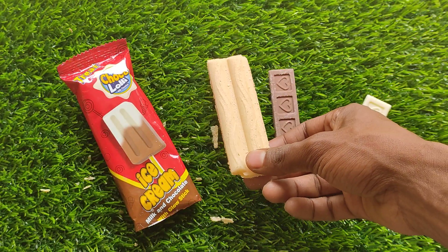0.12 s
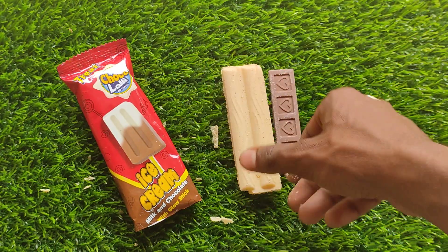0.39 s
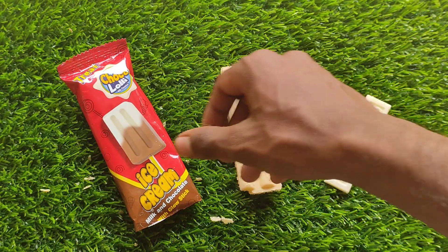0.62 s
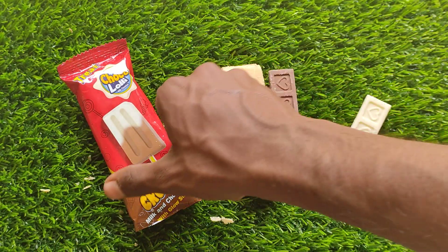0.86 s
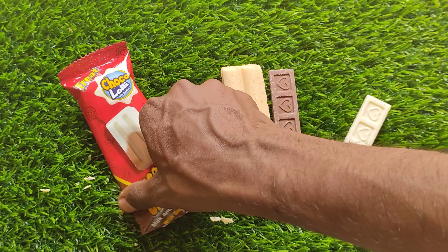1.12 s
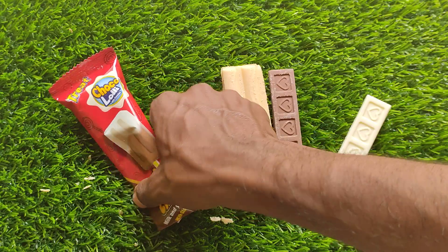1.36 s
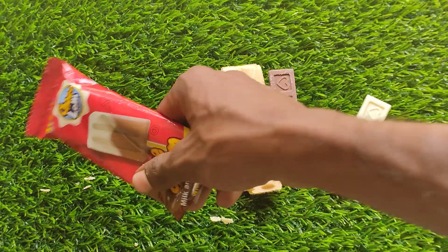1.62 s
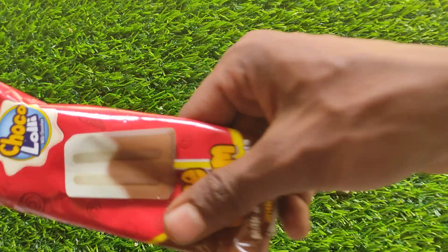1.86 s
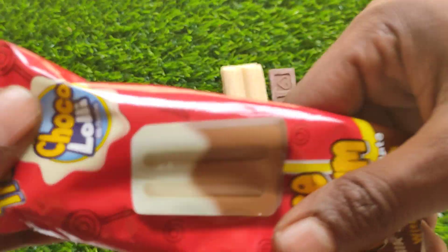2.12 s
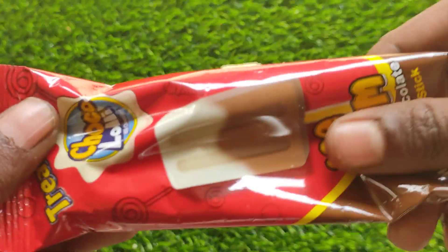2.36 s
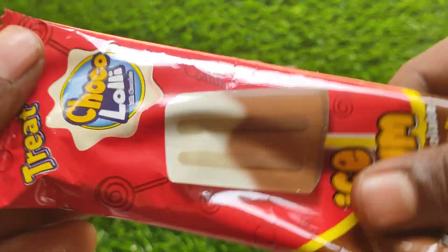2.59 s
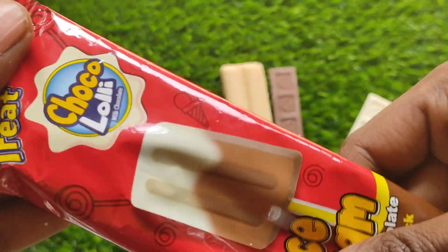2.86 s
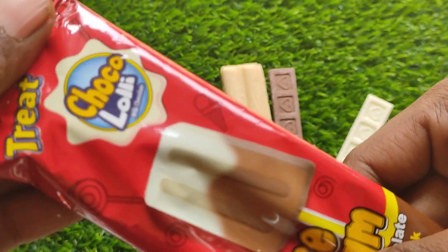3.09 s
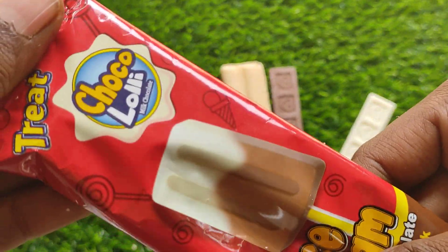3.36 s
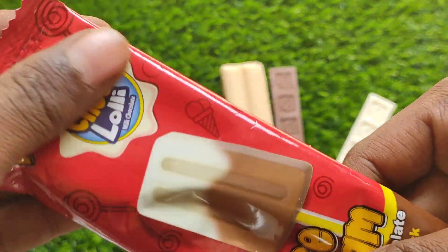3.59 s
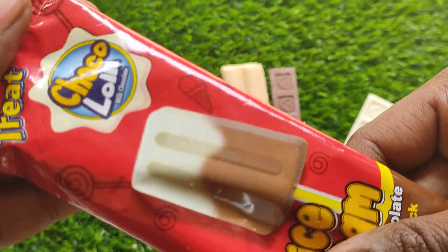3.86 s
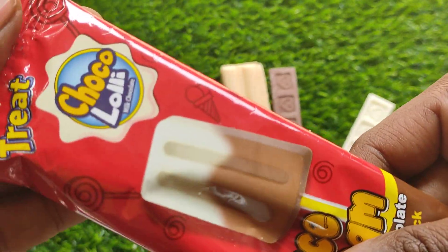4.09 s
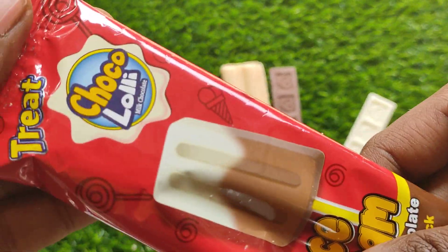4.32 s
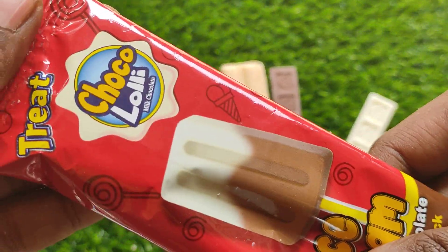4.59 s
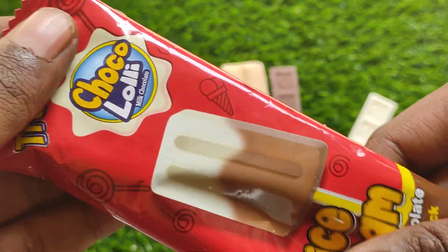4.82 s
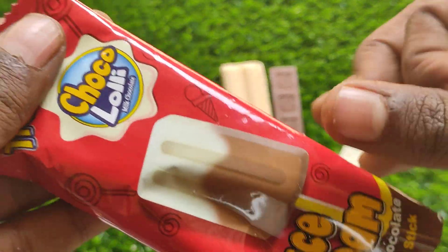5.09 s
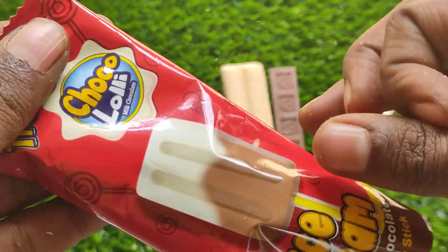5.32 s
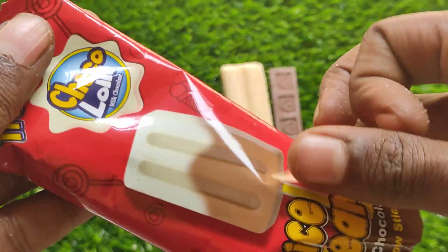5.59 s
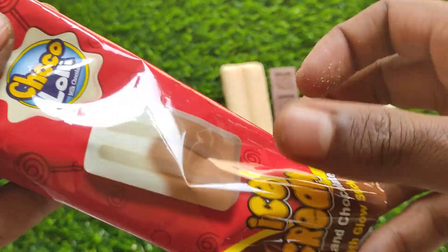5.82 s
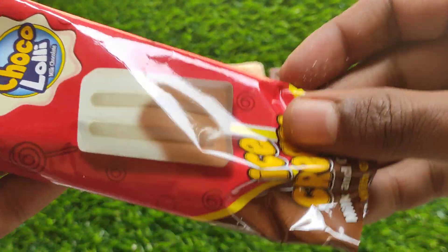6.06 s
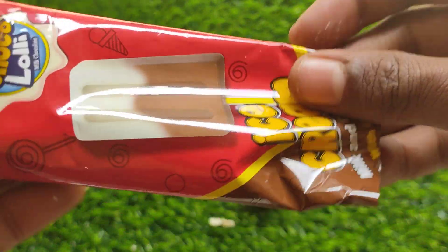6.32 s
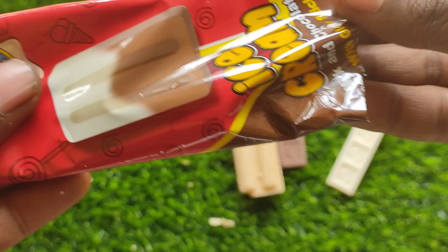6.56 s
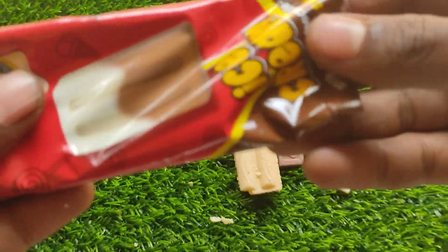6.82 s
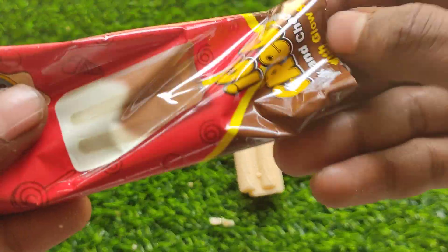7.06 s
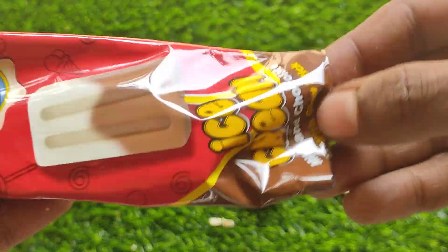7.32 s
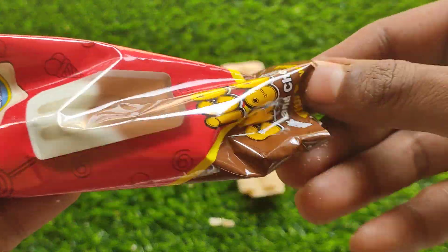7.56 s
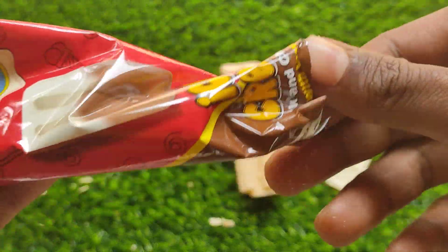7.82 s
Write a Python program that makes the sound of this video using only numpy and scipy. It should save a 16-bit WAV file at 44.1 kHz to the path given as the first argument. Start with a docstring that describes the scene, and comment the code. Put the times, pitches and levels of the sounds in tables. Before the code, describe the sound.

Close stereo microphones catch a thin, foil-lined wrapper handled outdoors. About a second of low rumble and hiss comes first, with faint grass swishes and a soft knock. Then bright, dry snaps and fine crinkle arrive in bursts, thin out in the middle, return as three strong flicks, and thicken into continuous crackling. A distant bird chirps every couple of seconds; nearby walls add a very short tail.

```python
"""A foil-lined sweet wrapper crackles in the hands, close to a pair of microphone ports.
Facets of the film buckle with short ringing snaps over a fine crinkle; nearby walls add a short tail.
A far bird chirps now and then, with swishes of grass, a faint whistle and soft knocks.
Low rumble and hiss are filtered noise; a dull swell is noise through a few low resonances."""
import sys
import numpy as np
from scipy import signal
from scipy.io import wavfile
from scipy.ndimage import uniform_filter1d

SR = 44100
rng = np.random.default_rng(int(sys.argv[2]) if len(sys.argv) > 2 else 0)


def generate_wav(signal):
    """Clip the signal to [-1, 1] and save it as 16-bit WAV at the path in sys.argv[1]."""
    frames = np.transpose(np.atleast_2d(signal))
    scaled = np.clip(frames, -1, 1) * 32767
    pcm = np.round(scaled).astype(np.int16)
    wavfile.write(sys.argv[1], SR, pcm)


def amplitude_ratio(level_db):
    """Convert a level in decibels to the matching linear amplitude (field) ratio."""
    exponent = np.asarray(level_db, float) / 20
    return 10 ** exponent


N = 349713   # length in samples

# Colour of the rumble and hiss. Each row: frequency in Hz, relative level in dB per Hz.
AIR_COLOUR = [(12, -30), (20, 2), (72, 1.5), (158, -13.5), (262, -14), (434, -25), (897, -25), (1860, -30),
              (3740, -30), (4540, -40.5), (7520, -41), (9670, -56.5), (13500, -29), (16000, -51.5)]
# How alike the air is at the two ports. Each row: frequency in Hz, likeness (1 = the same, 0 = unrelated).
AIR_LIKENESS = [(60, 0.76), (240, 0.75), (950, 0), (3770, 0.053), (15000, 0.73)]
# When the bird calls. Each row: start in seconds, level in dB before the distance is added.
BIRD_CALLS = [(-.13, -61), (1.964, -57), (4.206, -57), (6.242, -57)]
# The shape of one chirp. Each row: time into the chirp in seconds, pitch in Hz, relative level in dB.
CHIRP_SHAPE = [(0, 4550, -25), (.008, 5400, 1.5), (0.03, 4800, 0.5), (0.044, 4500, -12), (.058, 3780, 4),
               (0.074, 3100, -12.5), (.085, 3130, -21)]
# The hand brushes the grass. Each row: start in seconds, level in dB before the fade, upper edge in Hz.
GRASS_BRUSHES = [(0.129, -57, 3200), (.385, -61, 8000), (.66, -69.5, 8950)]
# A faint far whistle. Each row: time in seconds, pitch in Hz, level in dB.
WHISTLE_PATH = [(.2, 3600, -100), (.24, 3490, -78), (.32, 3460, -79), (.37, 3480, -100)]
# Soft knocks. Each row: start in seconds, level in dB before the fade, pitch in Hz.
KNOCKS = [(0.431, -44, 83), (4.913, -40.5, 113.4), (4.943, -39.5, 104), (5.241, -34.5, 183),
          (5.509, -32, 159.6), (5.794, -32, 73), (6.146, -37, 124), (6.175, -40, 108)]
# How hard the hands work the film. Each row: time in seconds, fine crinkle level in dB.
HAND_WORK = [(.97, -70.5), (1.07, -67.5), (1.23, -61), (1.75, -62.5), (1.86, -73.5), (2.16, -71),
             (2.21, -68.5), (2.69, -69), (3.0, -68), (3.05, -76), (3.45, -74), (3.7, -57.5), (3.85, -70.5),
             (4.85, -75), (4.95, -50), (5.0, -73), (5.98, -71), (6.04, -68), (6.42, -61.5), (6.47, -56.5),
             (6.78, -53.5), (6.87, -55), (7.0, -45.5), (7.07, -59.5), (7.36, -60.5), (7.46, -64.5),
             (7.54, -48.5), (7.75, -71.5), (7.8, -46.5), (7.93, -65)]
# Where the hands are. Each row: time in seconds, head start of the left port in ms, left over right in dB.
HAND_PLACE = [(0, 0.059, -1), (1.5, .12, 3), (2.5, 0.11, 0.5), (3.502, 0.19, 1), (4.7, 0.25, -1),
              (5.502, 0.11, -0.4), (6.2, .24, 3.6), (7.9, 0.26, 3)]
# Colour of the crinkle. Each row: frequency in Hz, relative level in dB per Hz.
FILM_COLOUR = [(300, -3.5), (900, -8.5), (2500, 4), (4700, -12.5), (7500, -8), (11000, -18.5),
               (14000, -11.5)]
# The clearest buckles of facets. Each row: time in seconds, level in dB, centre of the ringing in Hz,
# bass in dB against that level, top in dB against that level (both before a shared lift).
CLEAR_BUCKLES = [(1.038,-26,4270,-24,-14),(1.082,-42.5,5600,-18.5,-12),
                 (1.1706,-42.5,6400,-17.5,-13),(1.1986,-30,4600,-26.5,-11),(1.281,-32.5,6100,-15,-6),(1.3165,-35,6760,-28,-7),
                 (1.351,-35,3250,-26.5,-15),(1.456,-49,3950,-10,-11),(1.5096,-41.5,6500,-24,-10),(1.5554,-38,5500,-24,3.5),(1.6755,-36.5,2700,-19,-17),(1.691,-36.5,3200,-12,-18),
                 (1.739,-42.5,3900,-3,-22),(1.7768,-27.5,5800,-26,-12),(1.8073,-35.5,5460,-12.5,-19),(1.847,-34.5,3540,-16.5,-13),
                 (2.0528,-37,4530,-13,-10),(2.178,-24.5,6200,-14,-18),(2.1856,-19.5,5450,-16.5,-5.5),(2.207,-38,5000,-6.5,-11),
                 (2.2504,-27,4000,-19,-13),(2.2563,-14.5,4600,-13.5,-7),(2.2672,-28,3500,-16,-12),(2.306,-26.5,4300,-18,-12),
                 (2.332,-34.5,2800,-7.5,-23),(2.3765,-38,4770,-15.5,-7),(2.4045,-31.5,3800,-2.5,-24),(2.4118,-29.5,5040,-16,-10),
                 (2.432,-16,5740,-23.5,-14.5),(2.4429,-22,5130,-25.5,-13),(2.5523,-35,4660,-10.5,-19),(2.5613,-31,3000,-14.5,-17),
                 (2.599,-14,4800,-24.5,-21),(2.6043,-20,4500,-20,-16),(2.6378,-25,7700,-20.5,0.5),(2.6518,-48,6700,-16,-3),(2.6655,-36,3300,-18,-21),
                 (2.675,-35,4500,-7,-23),(2.754,-41,6400,-16,-18),(2.7998,-31,3400,-11,-19),(2.871,-30.5,4070,-11,-10),
                 (2.9901,-31,5300,-11,-9.5),(3.1329,-45,4450,-6,-17),(3.18,-44,6200,-10,-8),(3.402,-39.5,4560,-12,-16),
                 (3.4792,-22.5,3750,-12.5,-17.5),(3.4893,-34,6000,-9,5.5),(3.4955,-17.5,7100,-27.5,-9),(3.5176,-35,4900,-13,-21),
                 (3.5294,-24,5530,-12.5,-5),(3.594,-40,3730,-2.5,-12),(3.69,-18,5200,-20,-11),(3.7199,-30,5500,-7,-11),
                 (3.725,-31,4180,-9,-9),(3.8141,-38.5,7140,-12,2.5),(3.844,-43.5,2800,-2.5,-29),(3.994,-36.5,3900,-7,-20),
                 (4.0208,-26.5,5900,-14.5,-1.5),(4.0586,-25.5,5700,-14.5,-9),(4.725,-27,7600,-24.5,2),(4.7612,-23,4900,-18.5,-12),
                 (4.886,-46,4100,-1.5,-11),(4.9228,-51,4430,-6,-12.5),(4.9705,-37.5,6650,-9.5,-9.5),(5.2516,-18,4130,-11.5,-10),(5.256,-13,3350,-9.5,-13),
                 (5.2838,-33,5400,-17,-9),(5.2935,-32.5,4450,-9.5,-14),(5.5112,-7,4600,-17,-13),(5.5189,-15.5,6040,-6.5,-23),(5.569,-36.5,4300,-5.5,-17),
                 (5.6136,-33,5830,-19.5,-13),(5.7981,-18,3700,-13.5,-7),(5.8052,-12.5,3890,-7,-10),(5.832,-28,3400,-4.5,-18),
                 (6.0022,-31,5500,-15,-16),(6.0195,-28,3500,-12.5,-17),(6.042,-21.5,2760,-19.5,-26),(6.0683,-33.5,4280,-2,-10.5),
                 (6.101,-38,3420,-4,-25),(6.1942,-29.5,3600,-6.5,-15),(6.2088,-20,7060,-23.5,-15),(6.2134,-29.5,4500,-5,-6),
                 (6.3426,-42,6900,-8.5,-4),(6.4434,-41,4200,-1,-19),(6.462,-30.5,2980,-8.5,-7.5),(6.4763,-28.5,2780,-14.5,-31),
                 (6.536,-39,5100,-1,-6),(6.555,-34.5,6200,-7,-10),(6.5874,-44.5,3230,-6,0),(6.6452,-21.5,6470,-21.5,0.5),
                 (6.6977,-40,4400,1.5,-4),(6.7391,-34,5730,-7,-2),(6.8052,-32,2940,-10,-20),(6.8215,-33,6400,-6,-5),(6.902,-25,4440,-23.5,-9),
                 (6.925,-36,3500,-7.5,-1),(6.9306,-29,3000,-19.5,-12),(6.968,-46,2390,-6,-8),(6.9845,-38,5330,-22.5,-5),(6.9906,-40.5,3500,1.5,5),(7.055,-32.5,4000,-32,-8),(7.097,-27,5800,-17.5,-8),
                 (7.1056,-34,4200,-10,-10),(7.11,-17,4800,-43,-8.5),(7.1264,-22.5,6000,-13.5,-8),(7.175,-25,6940,-21.5,-4),
                 (7.2115,-30,3780,-1,-6),(7.2458,-24,4470,-26,-4),(7.313,-15.5,2970,-19.5,-7.5),(7.337,-29.5,4000,-5.5,-2),
                 (7.3531,-18,6500,-28.5,-2),(7.357,-21.5,4930,-10,-3.5),(7.3673,-21,3800,-15.5,-17),(7.3786,-21.5,4500,-15,-11),
                 (7.402,-26,6000,-9,-8),(7.4542,-27,6200,-34,-9),(7.5387,-31.5,3320,2.5,0),(7.542,-32,4400,-15,-6.5),
                 (7.557,-34.5,3486,-2.5,-22),(7.6443,-31.5,5500,-3.5,-17),(7.6512,-28.5,6140,-10.5,-1),(7.7094,-28.5,6430,-11.5,-3),
                 (7.7635,-14.5,6070,-26,-4.5),(7.7932,-30,4220,-18,-13),(7.8118,-28.5,5000,-17.5,-15),(7.8453,-21.5,6050,-9.5,-12),
                 (7.8705,-31,4200,-9.5,-29),(7.8839,-33,3350,-5,-26)]
# The dull swell over time. Each row: time in seconds, level in dB.
SWELL_LEVEL = [(4.3, -86), (4.348, -89), (4.378, -57), (4.594, -69), (4.626, -55.5), (4.836, -55.5),
               (5.15, -79.5)]
# Resonances of the dull swell. Each row: frequency in Hz, width in Hz, relative level in dB.
SWELL_RESONANCES = [(201, 19, 6.5), (256, 20, 9), (323.3, 25, 14), (367, 12, 11.5), (507, 17, -8),
                    (611, 14, 4.5), (714, 51, -5)]
# Colour of the microphone ports. Each row: frequency in Hz, width in Hz, gain in dB.
PORT_COLOUR = [(7110, 1310, 6.5), (10400, 3100, -4)]

AIR_DB, AIR_LEFT_DB = -57, 0.5   # the rumble and hiss lean left
BRUSH_RISE_S, BRUSH_T60_S, BRUSH_LOW_HZ = 0.0039, 0.39, 700
PICKUP_S = 0.96    # the film is untouched before this
STILL_DB = -73     # handling below this leaves the film all but silent
STIR_DB, STIR_T60_S, STIR_CAP_DB = -29, 0.28, -70.5   # a clear buckle stirs a dying patter of creases
LEAD_IN_DB, LEAD_IN_T60_S = 5.5, 0.014   # and the crinkle swells briefly just before each clear buckle
FOLD_MS, FOLD_MS_PER_BASS_DB = 2.2, 0.0555   # bassier facets are larger and fold more slowly
FLICKS_S, FLICK_LENGTH_S, FLICK_FOLD_MS = [5.245, 5.505, 5.79], 0.07, 4.0   # flicks fold whole panels
CLUMP_S = 0.012    # chance buckles come in threes, spread about this far
LESSER_OVER_DB, LESSER_SPREAD_DB = 10.5, 3.0   # how far chance buckles stand over the crinkle
LESSER_BASS_DB, LESSER_TOP_DB, LESSER_COLOUR_DB = -7.5, -8, 7
STEADY_TOP_HZ, ROLL_OFF_HZ = 15000, 14400   # where the steady sounds end, and where the whole mix rolls off


def in_time(rows):
    """Columns of a table, joined by straight lines, one value a sample."""
    s, *columns = np.transpose(rows)
    return [np.interp(np.arange(N) / SR, s, column) for column in columns]


def at_hz(points, hz):
    """A spectrum read on a log-frequency axis."""
    points = np.array(points)
    return np.interp(np.log(hz), np.log(points[:, 0] + 1), points[:, 1])


def rms_one(x):
    """Scaled to unit rms."""
    return x / np.sqrt(np.mean(x ** 2) + 1e-20)


def drift(rate):
    """Slow random wander of spread about 1, with rate new points a second."""
    points = rng.standard_normal(800)
    return np.interp(np.arange(N) / SR * rate, np.arange(800), points)


def filtered(kind, order, hz, x):
    """A Butterworth filter of the given kind: low, high or band."""
    return signal.sosfilt(signal.butter(order, hz, kind, fs=SR, output="sos"), x)


def resonator(x, hz, r):
    """Ringing at one pitch: a two-pole filter whose swing shrinks by r each sample."""
    return signal.lfilter([1, 0, -1], [1, -2 * r * np.cos(2 * np.pi * hz / SR), r * r], x)


def tail(x, t60, cut_hz, gap_s):
    """Diffuse reflections, unrelated at the two ports, building over gap_s and dying away."""
    t = np.arange(SR // 2) / SR
    echoes = rng.standard_normal((2, SR // 2)) * amplitude_ratio(-60 * t / t60) * (1 - np.exp(-t / gap_s))
    echoes = signal.lfilter([1], [1, -np.exp(-2 * np.pi * cut_hz / SR)], echoes)
    echoes = echoes / np.sqrt(np.sum(echoes ** 2) / 2)
    return signal.fftconvolve(x[None], echoes, axes=1)[:, :len(x)]


def air(patchy_db):
    """Half-octave bands of noise: alike at both ports in the bass, mostly unrelated hiss above."""
    out, edges = 0, 18 * 2 ** np.arange(0, 10, 0.5)
    white = rng.standard_normal((2, 2, N))
    for k, (low, high) in enumerate(zip(edges, edges[1:])):
        mid, side = filtered("band", 2, [low, high], white[k % 2])
        hz = np.sqrt(low * high)
        alike = np.clip(at_hz(AIR_LIKENESS, hz), -1, 1)
        gain = amplitude_ratio(at_hz(AIR_COLOUR, hz) + patchy_db * drift(4.8))
        # shared noise keeps its sign at both ports; the difference flips
        out = out + gain * (np.sqrt(1 + alike) * mid + np.sqrt(1 - alike) * side * [[1], [-1]])
    top = filtered("high", 2, edges[-1], white[1])
    return amplitude_ratio(AIR_DB) * rms_one(out + amplitude_ratio(at_hz(AIR_COLOUR, 13940)) * top)


def bird(echo_db):
    """A falling whistle, smeared by the echoes of its distance; the first is heard only dying away."""
    early = SR // 5   # room for a call that starts before the scene
    t, out = np.arange(SR // 9) / SR, np.zeros(N + early)
    s, hz, level_db = np.transpose(CHIRP_SHAPE)
    phase = 2 * np.pi * np.cumsum(np.interp(t, s, hz)) / SR
    call = np.sin(phase) * amplitude_ratio(np.interp(t, s, level_db, right=-99))
    for start, call_db in BIRD_CALLS:
        at = round(start * SR) + early
        out[at:at + len(t)] += amplitude_ratio(call_db) * call
    echoes = tail(out, t60=0.41, cut_hz=4200, gap_s=0.0077)
    return (amplitude_ratio(-4.0) * out + amplitude_ratio(echo_db) * echoes)[:, early:]


def brushes():
    """Soft, short swishes of blades of grass: bands of noise that start fast and die away."""
    out = 0
    for s, level_db, top_hz in GRASS_BRUSHES:
        age = np.maximum(np.arange(N) / SR - s, 0)
        swish = filtered("band", 2, [BRUSH_LOW_HZ, top_hz], rng.standard_normal((2, N)))
        fade = amplitude_ratio(level_db - 60 * age / BRUSH_T60_S) * (1 - np.exp(-age / BRUSH_RISE_S))
        out = out + rms_one(swish) * fade
    return out


def whistle():
    """A thin tone that sags a little: one sine wave following a drawn pitch."""
    hz, level_db = in_time(WHISTLE_PATH)
    return np.sin(2 * np.pi * np.cumsum(hz) / SR) * amplitude_ratio(level_db)


def thumps(t60, rise_s):
    """Soft low knocks: sine waves that die within a few cycles."""
    out, t = np.zeros(N + SR // 4), np.arange(SR // 4) / SR
    for s, level_db, hz in KNOCKS:
        at = round(s * SR)
        fade = amplitude_ratio(level_db - 60 * t / t60) * (1 - np.exp(-t / rise_s))
        out[at:at + len(t)] += np.sin(2 * np.pi * hz * t) * fade
    return out[:N]


def above(level_db, floor_db):
    """The part of a level that stands over a steady floor."""
    return 10 * np.log10(np.maximum(amplitude_ratio(2 * level_db) - amplitude_ratio(2 * floor_db), 1e-12))


def busy(s):
    """Level in dB that the hands draw from the film at moments s."""
    work_db = np.interp(s, *np.transpose(HAND_WORK))
    return np.where(s < PICKUP_S, -120, above(work_db, STILL_DB))


def handling():
    """Level of the crinkle: the work of the hands, plus a brief swell before and patter after each buckle."""
    s, level_db = np.transpose(CLEAR_BUCKLES)[:2]
    kicks = np.full(N, 1e-18)   # powers, so every dB is doubled inside amp
    kicks[(s * SR).astype(int)] = amplitude_ratio(2 * np.minimum(level_db + STIR_DB, STIR_CAP_DB))
    stir = signal.lfilter([1], [1, -amplitude_ratio(-120 / (STIR_T60_S * SR))], kicks)
    # run backwards in time, the decay becomes a rise
    lead_in = signal.lfilter([1], [1, -amplitude_ratio(-120 / (LEAD_IN_T60_S * SR))], kicks[::-1])[::-1]
    return 10 * np.log10(amplitude_ratio(2 * busy(np.arange(N) / SR)) + stir + amplitude_ratio(2 * LEAD_IN_DB) * lead_in)


def crinkle(level_db, per_s, clump_db, size_db, cycles, unlike):
    """Tiny creases come in clumps, each ringing a few small patches; some reach one port only."""
    lead_ms, side_db = in_time(HAND_PLACE)
    sizes = amplitude_ratio(size_db * np.minimum(rng.exponential(1, (3, N)), 4)) * rng.choice([-1, 1], (3, N))
    born = rng.random((3, N)) < per_s * amplitude_ratio(clump_db * drift(60.0)) / SR
    shared, left, right = sizes * born
    # the right port hears the shared creases, and the patches they ring, a little later
    delayed = np.round(np.arange(N) - lead_ms * SR / 1000).astype(int).clip(0)
    dealt, out = rng.integers(0, 18, (4, N)), 0   # up to four of 18 pitches for each crease
    late_dealt, late = dealt[:, delayed], shared[delayed]
    for k, hz in enumerate(np.geomspace(330, 13600, 18)):
        r = amplitude_ratio(-60 / ((0.0006 + cycles / hz) * SR))
        left_clicks = (shared + unlike * left) * (dealt == k).any(0)
        right_clicks = (late + unlike * right) * (late_dealt == k).any(0)
        ring = resonator(np.array([left_clicks, right_clicks]) + 1e-18, hz, r)
        # each band's level wanders slowly at random, so the colour is patchy
        out = out + rms_one(ring) * amplitude_ratio(at_hz(FILM_COLOUR, hz) + 3.8 * drift(12.0)) * np.sqrt(hz)
    return rms_one(out) * amplitude_ratio(level_db + np.outer([0.5, -0.5], side_db))


def lesser_snaps(count):
    """Small buckles at chance moments, as strong as the hands are busy, each with its own colour."""
    when, size, pitch, low, high = rng.random((count, 5)).T
    clump_s = np.repeat(rng.random(count // 3), 3) * N / SR
    s = np.minimum(clump_s - CLUMP_S * np.log(when), (N - 1) / SR)
    level_db = busy(s) + LESSER_OVER_DB - LESSER_SPREAD_DB * np.log(size + 0.024)
    bass_db = LESSER_BASS_DB + LESSER_COLOUR_DB * (2 * low - 1)
    top_db = LESSER_TOP_DB + LESSER_COLOUR_DB * (2 * high - 1)
    return np.transpose([s, level_db, 2800 * 2.5 ** pitch, bass_db, top_db])


def rings(hz, level_db, start_s, t60, lead_s, rise_s):
    """Damped sines, shape (events, modes), summed per event at both ports; peak 1 at the left."""
    t = np.arange(640, dtype=np.float32) / SR
    turn = (2 * np.pi * hz)[..., None].astype(np.float32)
    fall = (np.log(1000) / t60)[..., None].astype(np.float32)
    ports = []
    for late in (0 * lead_s, lead_s):
        age = np.maximum(t - (start_s + late[:, None])[..., None], 0).astype(np.float32)
        swing = np.exp(-fall * age) * np.minimum(age / rise_s, 1)
        ports.append(np.einsum("emt,em->et", np.sin(turn * age) * swing, amplitude_ratio(level_db)))
    ports = np.array(ports)
    return ports / np.abs(ports[0]).max(1)[:, None]


def snaps(run_on, cycles, shortest_s, focus_db, bass_db, top_db, scatter_db):
    """Each buckle sets a scatter of patches of film ringing while the fold runs along."""
    s, level_db, centre_hz, low_db, high_db = np.vstack([CLEAR_BUCKLES, lesser_snaps(count=360)]).T
    flicked = (np.abs(s[:, None] - FLICKS_S - FLICK_LENGTH_S / 2) < FLICK_LENGTH_S / 2).any(1)
    fold_ms = np.where(flicked, FLICK_FOLD_MS, FOLD_MS + FOLD_MS_PER_BASS_DB * low_db)
    run_s = run_on * np.clip(fold_ms - 0.4, 0.1, 8)[:, None] / 1000
    moments, lead_ms, side_db = np.transpose(HAND_PLACE)
    lead_s = np.interp(s, moments, lead_ms) / 1000
    # each band: low edge in Hz, high edge in Hz, number of patches, level in dB against the snap
    bands = [(2000, 9000, 18, 0), (300, 2000, 8, low_db + bass_db), (9000, 14800, 8, high_db + top_db)]
    shape = 0
    for low, high, count, rel_db in bands:
        place, when, strength, aim = np.moveaxis(rng.random((len(s), count, 4)), 2, 0)
        hz = low * (high / low) ** ((np.arange(count) + place) / count)
        patch_db = -focus_db * np.minimum(np.abs(np.log2(hz / centre_hz[:, None])), 1)
        patch_db = patch_db - 6.7 * np.log2(np.maximum(1400 / hz, 1))   # small facets radiate little bass
        patch_db = patch_db + 7 * strength - 11 * np.abs(when - 0.2)
        # facets beam their treble each its own way
        pan_db = np.interp(s, moments, side_db) + scatter_db * min(low / 3000, 1) * (2 * aim[:, 0] - 1)
        ring = rings(hz, patch_db, run_s * when, shortest_s + cycles / hz, lead_s, rise_s=0.0002)
        shape = shape + ring * amplitude_ratio(level_db + rel_db + np.outer([0.5, -0.5], pan_db))[..., None]
    out = np.zeros((2, N + 640))
    # the loudest part of each snap falls on its listed moment
    loudest = uniform_filter1d(np.sum(shape ** 2, 0), size=30)[:, :90].argmax(1)
    at = (np.round(s * SR).astype(int) - loudest).clip(0)[:, None] + np.arange(640)
    for port in range(2):
        np.add.at(out[port], at, shape[port])
    return filtered("high", 2, 220, out[:, :N])


def swell(level_db, lumpy_db, unlike, cut_hz):
    """A dull, lumpy low noise in a few resonances that swells and fades."""
    white, out = rng.standard_normal((2, N)), 0
    for hz, width, top_db in SWELL_RESONANCES:
        r = np.exp(-np.pi * width / SR)
        out = out + amplitude_ratio(top_db) * (1 - r) * resonator(white, hz, r)
    out = filtered("low", 4, cut_hz, out)
    ports = out[0] + unlike * out[1] * [[1], [-1]]
    return rms_one(ports) * amplitude_ratio(level_db + lumpy_db * drift(14.0))


def scene():
    """Wrapper, its tail and the background; the steady sounds are cut off at the very top."""
    cracks = snaps(run_on=1.3, cycles=5.6, shortest_s=0.0066, focus_db=5.5,
                   bass_db=1.5, top_db=1.5, scatter_db=12)
    fine = crinkle(handling(), per_s=1500, clump_db=8, size_db=4.8, cycles=3.5, unlike=0.7)
    walls = amplitude_ratio(-13.5) * tail((cracks + fine)[0], t60=0.16, cut_hz=8400, gap_s=0.0005)
    s, swell_db = np.transpose(SWELL_LEVEL)
    swell_db = np.interp(np.arange(N) / SR, s, swell_db, left=-99, right=-99)
    dull = swell(swell_db, lumpy_db=-2.0, unlike=0.82, cut_hz=950)
    far = bird(echo_db=3.5) + whistle()
    grass = brushes()
    outdoors = air(patchy_db=3.5) * amplitude_ratio([[AIR_LEFT_DB / 2], [-AIR_LEFT_DB / 2]])
    steady = fine + walls + dull + grass + far + outdoors
    steady = signal.sosfilt(signal.cheby2(12, 60, STEADY_TOP_HZ, fs=SR, output="sos"), steady)
    return cracks + steady + thumps(t60=0.068, rise_s=0.00068)


def roll_off(x):
    """The treble ends steeply here."""
    return signal.sosfilt(signal.butter(12, 16810, fs=SR, output="sos"), x)


def record(dry):
    """The microphone ports colour the treble, then the top is rolled off."""
    for hz, width, gain_db in PORT_COLOUR:
        r = np.exp(-np.pi * width / SR)
        band = resonator(dry, hz, r) * (1 - r * r) / 2
        dry = dry + (amplitude_ratio(gain_db) - 1) * band
    rolled = filtered("low", 6, ROLL_OFF_HZ, dry)
    return roll_off(rolled)


dry = scene()
out = record(dry)
generate_wav(out)
```